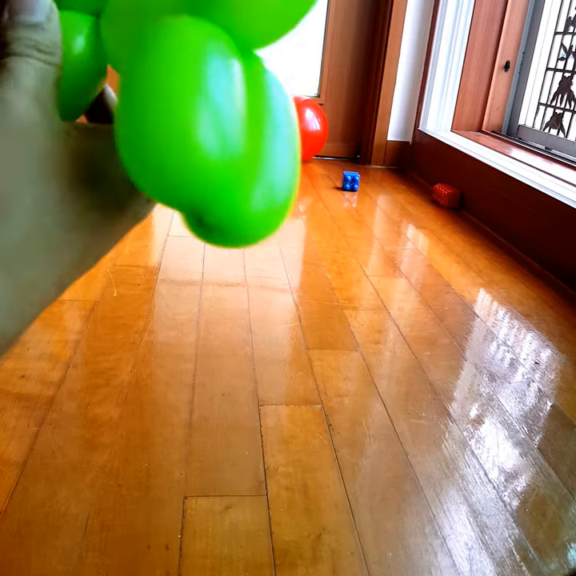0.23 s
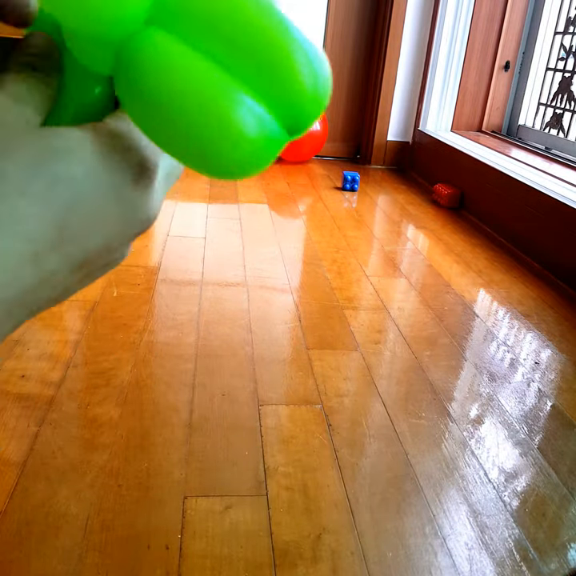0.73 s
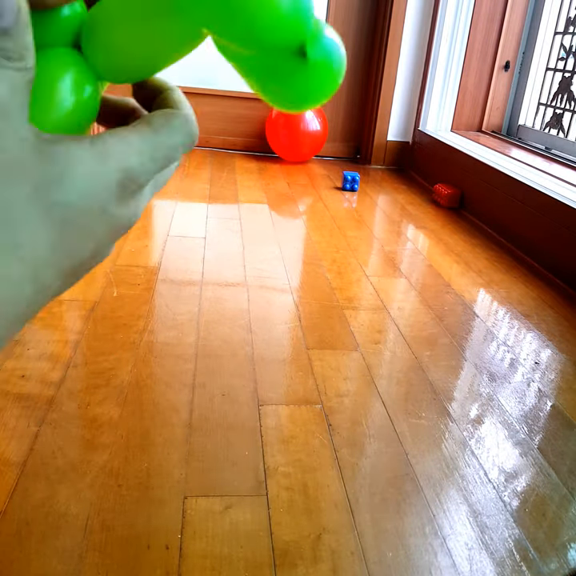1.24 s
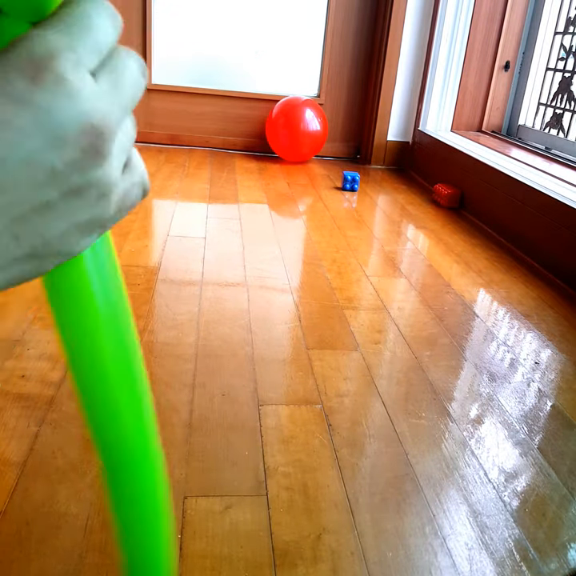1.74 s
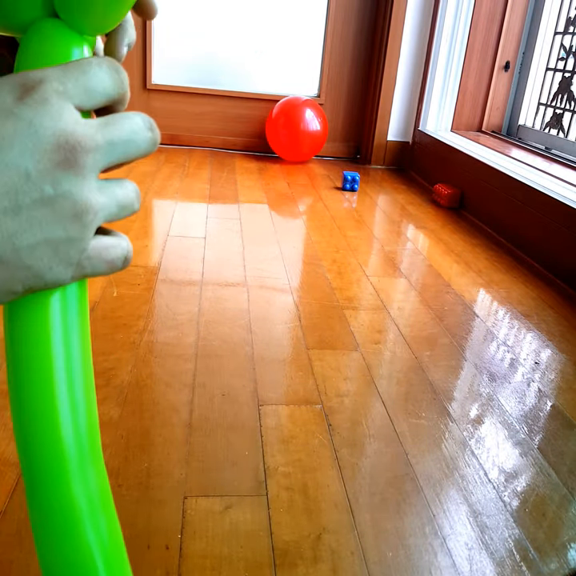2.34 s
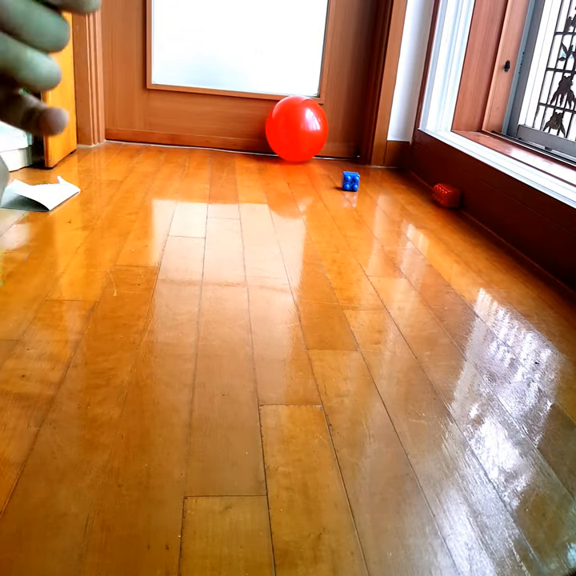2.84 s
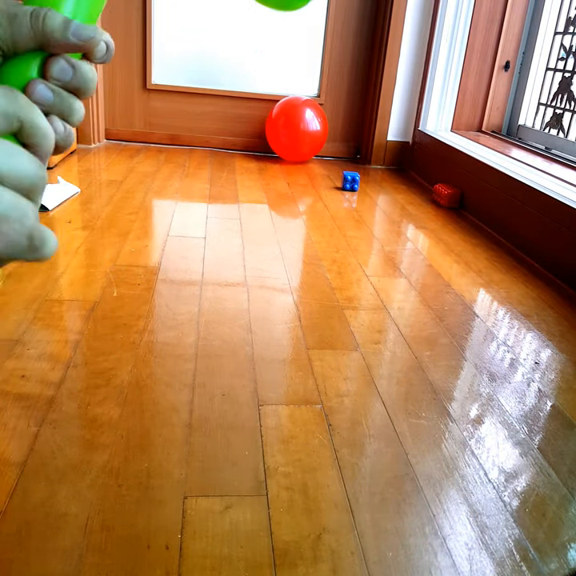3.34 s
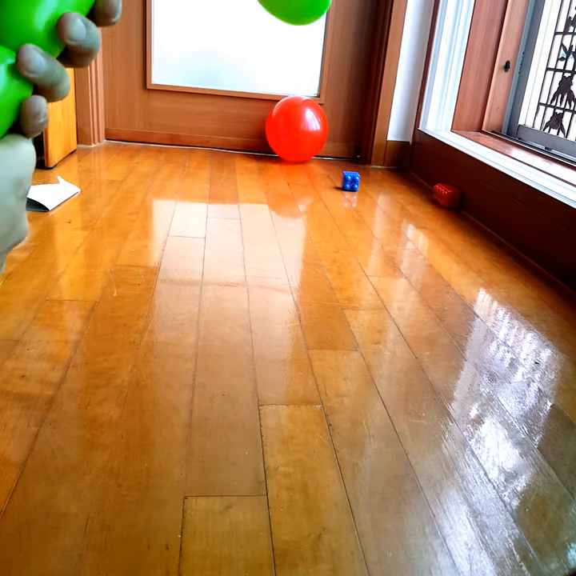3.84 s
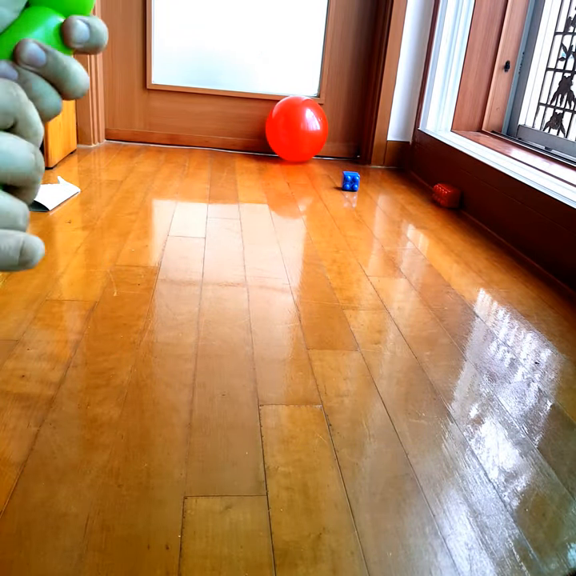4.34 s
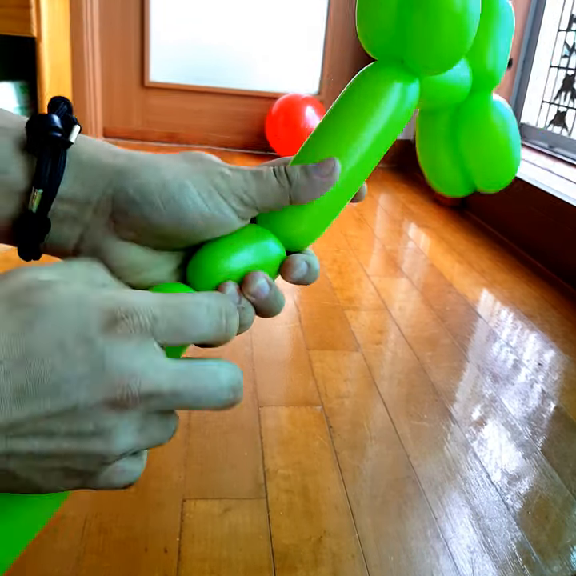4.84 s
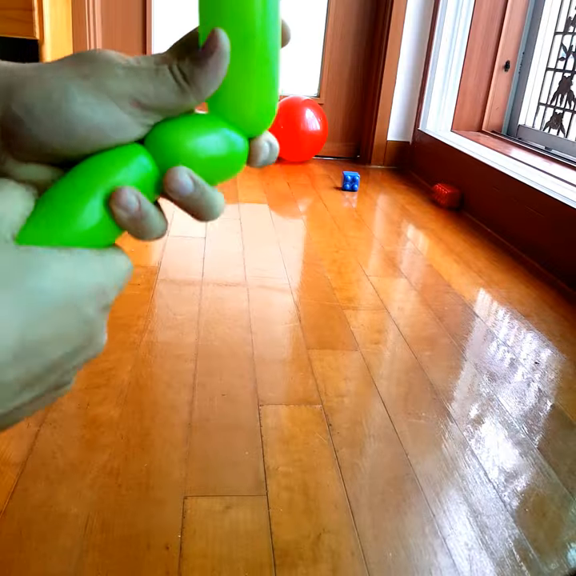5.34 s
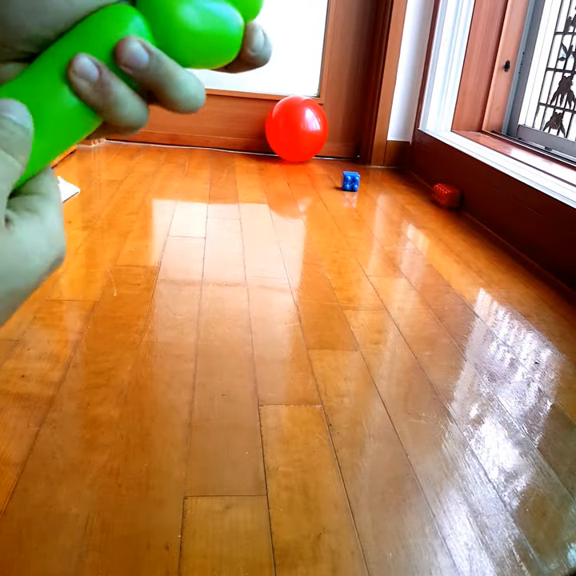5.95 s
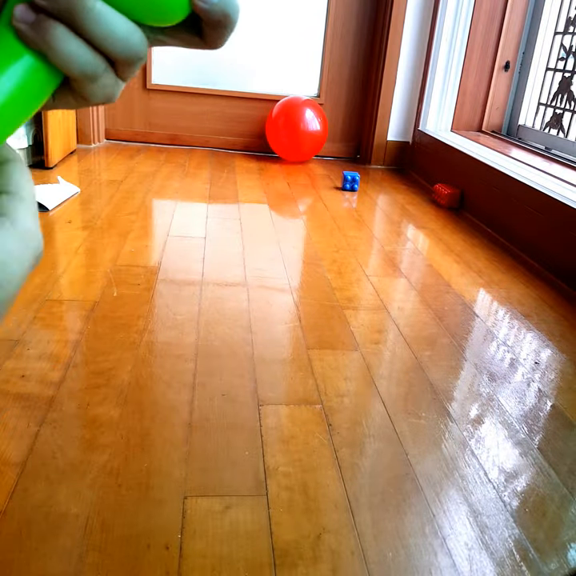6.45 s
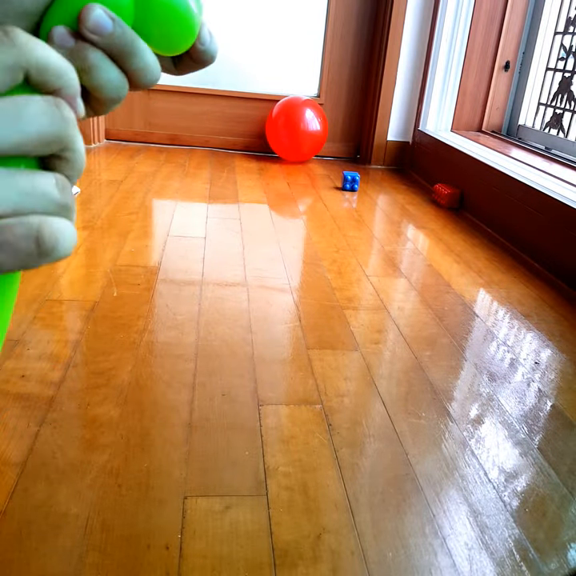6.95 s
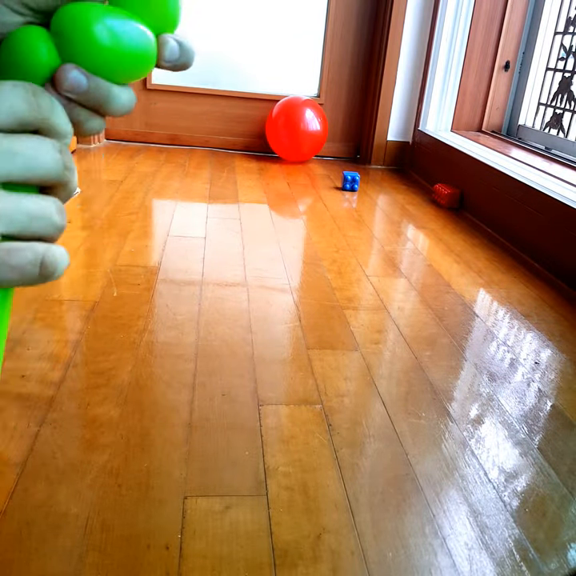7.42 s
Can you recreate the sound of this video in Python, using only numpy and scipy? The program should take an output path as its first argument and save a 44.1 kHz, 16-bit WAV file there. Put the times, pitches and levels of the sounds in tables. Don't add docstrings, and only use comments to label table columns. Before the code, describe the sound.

Hands twist a long latex balloon up close, giving rubbery squeaks, stuttering creaks and sharp little snaps in a small quiet room.

```python
import sys
import numpy as np
from scipy import signal
from scipy.io import wavfile
from scipy.ndimage import uniform_filter1d, minimum_filter1d

SR = 44100
rng = np.random.default_rng(int(sys.argv[2]) if len(sys.argv) > 2 else 0)


def wrap_up_sound(samples):
    columns = np.atleast_2d(samples).T
    tamed = np.clip(columns, -1, 1)
    steps = np.round(tamed * 32767).astype(np.int16)
    wavfile.write(sys.argv[1], SR, steps)


def ratio(d):
    e = np.asarray(d, float) / 20
    return 10 ** e


N = 338688

# [t/s, level/dB, brightness of all rubbing/dB]
DRAG = [(0.0, -50, -6.5), (0.21, -29, -4.5), (0.83, -47, -7.5), (0.98, -40, -3), (1.73, -49.5, -5.5),
        (1.92, -26, -6), (2.37, -48, -14.5), (2.69, -47, -14), (2.95, -26, -6), (4.11, -31.5, -3.5),
        (4.49, -47, -9), (5.09, -27, -9), (5.69, -31, -11), (6.59, -27, -7), (7.04, -80, -9),
        (7.68, -57, -16.5)]
# [t/s, ring f/Hz, brightness/dB, fullness/dB]
GRIPS = [(0.0, 2080, -9, -16), (0.055, 3060, 2, 4), (0.179, 3800, -0.5, 5), (0.276, 3800, 6.5, 1.5),
         (0.477, 3780, 8, 1), (0.563, 3800, 5.5, 4.5), (0.807, 3440, -8, 6), (0.958, 4700, -6, 2),
         (1.084, 3600, 4.5, -3.5), (1.41, 3880, 6, -7), (1.721, 3640, 2.5, 1), (1.866, 1510, 4, -21),
         (1.975, 3350, 5, 4), (2.15, 3360, 14.5, 10), (2.707, 3540, 3, -1), (2.794, 3730, 7.5, 4.5),
         (2.863, 4030, 4.5, 4), (2.945, 2930, -10, -15), (3.045, 3730, 5, -14), (3.108, 2600, 3, 4.5),
         (3.3, 4560, 3, -21), (3.409, 1790, 6, -15), (3.475, 3820, -0.5, 7), (3.542, 3650, 0, -2),
         (3.802, 3320, 6.5, -2), (3.86, 4830, -7, 4.5), (4.142, 3750, 1, -1), (4.28, 3850, 6.5, -5),
         (4.463, 3470, 3, -8), (4.711, 2620, 0.5, -4), (4.778, 4950, 1, -1), (4.861, 3570, 2.5, 10),
         (4.918, 2060, 0.5, -5), (5.124, 3670, 2.5, -13), (5.278, 3500, 6.5, -5), (5.39, 2640, 1.5, 5.5),
         (5.545, 2460, -11, -9), (5.65, 2170, 5, -12), (5.72, 3630, -1, 9.5), (5.891, 3800, 7.5, 6.5),
         (6.018, 3600, -2, 0.5), (6.202, 3300, -1, -1), (6.336, 2500, 2.5, 2), (6.438, 3870, 10, 4.5),
         (6.59, 3350, 3.5, -12), (6.662, 3940, -0.5, 3), (6.91, 3500, 0, 0), (7.144, 3200, 7.5, 8),
         (7.344, 3300, 8.5, 6), (7.512, 3480, 10, 5.5)]
# [t/s, ring f/Hz]
VISITS = [(.05, 2660), (.439, 1490), (1.051, 6300), (1.435, 7250), (1.877, 1400), (1.916, 1440),
          (2.63, 1490), (2.945, 3050), (3.12, 2610), (3.668, 6540), (3.7, 6240), (3.812, 7200),
          (3.989, 6740), (4.052, 9100), (4.098, 9600), (4.561, 1680), (4.728, 2900), (4.788, 4800),
          (4.91, 2330), (4.941, 2330), (5.474, 2670), (5.541, 2630), (5.695, 2150), (5.944, 4400),
          (6.042, 6540), (6.361, 2580), (7.55, 7000)]
# [t/s, length/ms, peak level/dB, air-chamber level/dB]
LET_GOES = [(0.0, 18, -26, -30), (.186, 41, -29, -12), (.575, 136, -35, -2.5), (1.434, 5.7, -24.5, -6),
            (1.729, 15, -27.5, -20), (1.771, 92, -21.5, -13.5), (1.876, 50, -30, -9),
            (1.917, 38, -26.5, -3.5), (2.026, 104, -22, -5), (2.32, 8.7, -27.5, 4.5),
            (2.743, 49, -28, -0.5), (3.252, 14.6, -24, -16), (3.487, 32, -27, -3.5), (4.033, 2.3, -26, -8),
            (4.29, 39, -25.5, -25), (4.33, 58, -28, -26), (4.941, 53, -23.5, -12), (5.088, 58, -21, -15),
            (5.173, 32, -9.5, -20), (5.474, 51, -33.5, -14), (5.58, 55, -21.5, -27), (5.694, 24, -19, -5),
            (5.944, 64, -24.5, -8), (6.678, 30, -21, -14), (6.823, 137, -32, -11), (6.986, 54, -23.5, -12),
            (7.476, 10, -21.5, -30), (7.498, 7.8, -22, -22)]
EASES = [(.073, 17, -35, -21), (.22, 32, -29, -7), (.356, 8.2, -18.5, -6.5), (.858, 13, -29, -21),
         (1.064, 54, -34, 0), (2.819, 38, -31, -12), (3.053, 76, -30.5, -19), (3.331, 39, -25, -34),
         (3.81, 51, -33.5, -11.5), (3.867, 54, -36.5, -16), (3.988, 88, -32.5, -9), (4.131, 51, -28, -29),
         (4.722, 54, -28, -33), (4.788, 39, -31, -9), (5.138, 26, -15, -39), (5.729, 61, -29.5, -7),
         (6.046, 28.4, -15.5, -9.5), (6.942, 57, -27.5, -9)]
SLIDES = [(.088, 23.6, -31.5, 3), (.439, 41, -50, 19.5), (.967, 60, -39.5, -6.5), (1.1, 42.6, -28.5, -26),
          (2.356, 17, -44.5, 3), (2.621, 120, -49.5, 4.5), (2.952, 30.5, -25.5, -31),
          (3.124, 43, -25.5, -27), (3.371, 70, -34.5, -34), (3.715, 21, -26, -24), (4.15, 32, -24.5, -20),
          (4.491, 32, -32.5, -33), (4.548, 54, -34, -6.5), (4.871, 26, -31.5, -11), (4.988, 26, -32.5, 1),
          (5.045, 32.5, -27, -17), (5.308, 32, -22.5, -9), (5.655, 23, -36.5, -27), (5.887, 64, -32, -6),
          (6.264, 15, -30.5, -27), (6.342, 79, -31, -12), (6.613, 16, -24, -10)]
PRESSES = [(.022, 19, -27, -37), (.05, 27.4, -22, -43), (.395, 25, -31.5, -28), (1.085, 14, -26, -27),
           (2.802, 19, -24, -28), (3.552, 62, -26.5, -5.5), (3.668, 54, -19.5, -41), (4.15, 43.4, -14, -14),
           (4.909, 26.4, -23, -15), (5.012, 37, -34, -4), (5.286, 22, -19, -39), (5.744, 46, -30, -4),
           (6.169, 16.1, -24.5, -30), (6.195, 66, -23.5, -14), (6.451, 51, -20, -3.5),
           (7.041, 19.8, -27.5, -5), (7.165, 34.7, -22, -17), (7.513, 39.6, -19.5, -15),
           (7.549, 20, -19, -1.5)]
BUILDS = [(.25, 77, -33.5, -21), (.346, 8.8, -19, -3), (.494, 8, -23, -16), (.876, 59, -33, -11),
          (1.745, 22, -24.5, -29), (1.989, 29, -26, -22), (2.088, 10.4, -27.5, -18),
          (2.858, 77, -21.5, -40), (3.303, 33, -28, -34), (4.057, 45, -20.5, -12), (5.552, 19, -23.5, -35),
          (6.316, 23, -30.5, -20), (6.73, 10.3, -18, -19), (6.905, 36, -27, -16), (7.336, 83, -19, -3.5)]
# [f/Hz, level per Hz/dB]
SKIN = [(470, -36), (800, -7.5), (908, -33.5), (1080, -12), (2870, -5.5), (3850, 1.5), (4480, -8.5),
        (6300, -12), (7150, -9), (8020, -16.5), (9330, -11), (14700, -20.5), (15900, -30), (16500, -76)]
# [f/Hz, width/Hz, level/dB]
CHAMBER = [
    (500, 134, -3),
    (635.6, 90, 6.5),
    (868, 51, 2.5),
    (1050, 104, 2.5),
]


def rubbing():
    t = np.arange(N) / SR
    drag_t, drag_db, bright_db = np.transpose(DRAG)
    drag_db, bright_db = np.interp(t, drag_t, drag_db), np.interp(t, drag_t, bright_db)
    power, low_power = ratio(2 * (drag_db - 18)), ratio(2 * (drag_db - 58))

    grips = np.array(GRIPS, float)
    grip = grips[np.searchsorted(grips[1:, 0], t)]
    patch_hz, sheen_db, full_db = uniform_filter1d(grip[:, 1:], size=300, axis=0).T
    visit_ms = 45
    for s, hz in VISITS:
        patch_hz[round(s * SR):][:round(visit_ms * SR / 1000)] = hz

    kinds = (LET_GOES, -24), (EASES, -8.5), (SLIDES, 0), (PRESSES, 12), (BUILDS, 19.5)
    for rows, change_db in kinds:
        for s, ms, peak_db, low_db in rows:
            ramp_db = np.linspace(0, change_db, round(ms * SR / 1000 + 2))
            burst = ratio(2 * (peak_db + ramp_db - ramp_db.max() - 2))
            add(power, s, burst)
            add(low_power, s, burst * ratio(2 * (low_db - 2.5)))
    power, low_power = uniform_filter1d(power, size=40), uniform_filter1d(low_power, size=200)

    drive = crackle(per_s=1700, spread_db=6.5, hiss=.2)
    beside = crackle(per_s=1700, spread_db=6, hiss=.22)
    fleeting = chirps(low_hz=1100, high_hz=7500, cycles=9, glide=.2, spread_db=9)

    skin = evened(coloured(drive + ratio(-8.5) * fleeting, SKIN))
    high = filtered(skin, 2, 5500, "high")
    low = filtered(skin, 2, 2300, "low")
    gleam = filtered(high, 1, 10000, "low")

    patch = evened(resonate(beside, patch_hz * (1 + .09 * wobble(N, size=1400)), 380))
    lobe = evened(resonate(resonate(drive + beside, patch_hz, 2040), patch_hz, 1980))
    chamber = evened(sum(ratio(db) * resonate(resonate(beside, hz, w), hz, 1.2 * w) for hz, w, db in CHAMBER))

    bright = (ratio(bright_db + 11) - 1) * high
    sheen = ratio(bright_db + 8.5) * (ratio(sheen_db) - 1) * gleam
    body = (ratio(full_db) - 1) * low
    upper = ratio(3.5) * (skin + bright + sheen + body) + ratio(-5) * patch + ratio(-3) * lobe
    return np.sqrt(abs(power)) * upper + np.sqrt(abs(low_power)) * chamber


def crackle(per_s, spread_db, hiss):
    size = ratio(spread_db * np.minimum(rng.exponential(1, N), 2.6)) * (rng.random(N) < per_s / SR)
    clumps = ratio(2.6 * wobble(N, size=90))
    slips = clumps * (evened(size * rng.choice([-1, 1], N)) + hiss * rng.standard_normal(N))
    strain = abs(uniform_filter1d(slips ** 2, size=500))
    return evened(slips / strain ** .4)


def chirps(low_hz, high_hz, cycles, glide, spread_db):
    out = np.zeros(N)
    for at, pitch, length, bend, size in rng.random((1600, 5)):
        hz = low_hz * (high_hz / low_hz) ** pitch
        n = int(SR / hz * cycles * (0.8 + 1.59 * length)) + 8
        turns = np.cumsum(np.linspace(hz, hz * (1 + glide * (2 * bend - 1)), n)) / SR
        tone = np.sin(2 * np.pi * turns) + 1.66 * np.sin(4 * np.pi * turns)
        add(out, at * N / SR, ratio(spread_db * size) * tone * np.hanning(n) ** 2.7)
    return evened(out)


# [t/s, length/ms, middle f/Hz, level/dB]
GROANS = [(.218, 21, 687, -29.5), (1.275, 11.3, 640, -31), (1.894, 44, 722, -26.5), (1.895, 42, 1420, -28),
          (4.566, 90, 1640, -36), (4.567, 60, 625, -43), (4.636, 44, 610, -40), (5.045, 6.9, 1320, -20),
          (5.165, 22, 810, -19), (5.184, 24, 705, -14), (5.204, 24, 700, -19), (5.238, 46, 670, -26),
          (6.531, 10, 775, -29.5), (6.733, 22, 685, -29)]
SQUEALS = [(1.936, 40, 700, -36), (3.105, 16, 1770, -29), (3.425, 19, 1628, -23.5), (4.15, 34, 3800, -17),
           (4.182, 12, 7070, -16), (4.682, 19, 1050, -38), (4.736, 16, 2600, -25), (5.149, 7, 1500, -13),
           (5.155, 16, 3936, -5), (5.695, 3.4, 2093, -9), (5.924, 34, 610, -21), (5.955, 34, 620, -29),
           (6.471, 46, 611, -28.5), (6.629, 10.6, 3250, -15), (6.689, 10, 730, -27), (7.368, 28, 1090, -24)]
SWOOPS = [(.029, 10, 2000, -31), (.036, 16, 1500, -29), (.061, 20, 950, -30), (.066, 14, 3150, -27),
          (3.412, 20, 1430, -36), (3.489, 16, 1100, -34), (4.17, 39, 681, -28), (5.318, 12, 1042, -21)]
BUZZES = [
    (3.696, 16, 1585, -21.5),
    (4.102, 12, 4780, -21),
    (7.4, 24, 521, -33),
    (7.565, 20, 725, -31),
]
RISES = [(.06, 20, 2453, -32), (1.877, 12, 1330, -24.5), (1.605, 14, 2170, -43), (3.313, 19, 3190, -22.5),
         (3.34, 16, 567, -41), (3.424, 30, 3120, -28), (3.55, 31, 1160, -28), (3.562, 22, 2430, -31.5),
         (4.082, 15, 2100, -28), (6.385, 13, 1730, -28.5), (6.396, 13, 2686, -26.5)]
WHINES = [(3.325, 9.5, 4600, -18), (3.812, 25, 7730, -33), (3.866, 21, 3850, -22.5),
          (3.866, 27.5, 7620, -26), (3.9, 31, 3130, -31.5), (4.17, 19, 2293, -14.5), (4.165, 35, 7050, -19),
          (4.79, 26, 4940, -26), (5.168, 21, 3820, -23), (6.452, 15.5, 3935, -15), (6.94, 23, 3766, -19.5)]


def squeaks():
    out = np.zeros(N)
    kinds = ((GROANS, -.1, -17.5), (SQUEALS, .024, -16), (SWOOPS, .25, -7),
             (BUZZES, .03, -3), (RISES, .11, -16.5), (WHINES, -.057, -16))
    for rows, bend, over_db in kinds:
        for s, ms, hz, db in rows:
            start_hz, end_hz = hz * (1 - bend / 2), hz * (1 + bend / 2)
            n = round(ms * SR / 1000)
            unsteady = 1 + .025 * wobble(4800, size=60)[:n]
            turns = np.cumsum(np.linspace(start_hz, end_hz, n) * unsteady) / SR
            tone = np.sin(2 * np.pi * turns)
            for k in range(2, min(7, int(15500 // end_hz) + 1)):
                rough_db = 3 * wobble(4800, size=50)[:n]
                tone += ratio(over_db - 3.5 * (k - 3.5) + rough_db) * np.sin(2 * np.pi * k * turns + k)
            flutter = evened(ratio(2.2 * wobble(4800, size=100)[:n]))
            add(out, s, ratio(db - .5) * tone * flutter * signal.windows.tukey(n, .35))
    return out


# [t/s, peak level/dB, ring f/Hz]
SNAPS = [(0.629, -22, 3520), (0.662, -17, 3640), (0.968, -17.5, 3060), (1.044, -17.5, 4870),
         (1.065, -5.5, 6100), (1.114, -7, 3420), (1.356, -15, 1360), (1.481, -27.5, 4600),
         (1.843, -13.5, 3660), (2.028, -7.5, 3240), (2.159, -18, 1440), (2.453, -25.5, 5540),
         (2.683, -22.5, 1790), (3.138, 2, 2600), (1.091, -14, 5150), (4.692, -16.5, 3850),
         (4.899, -4.5, 3700), (5.262, -13, 3120), (5.331, -3.5, 3760), (5.339, -6.5, 3800),
         (5.416, -14.5, 3730), (5.427, -15, 2680), (5.695, -9.5, 2200), (5.729, -6, 3780),
         (5.783, -24, 3430), (6.872, -22, 3280), (7.166, -19, 2010), (7.274, -17.5, 2000),
         (7.367, -11, 4600),
         (.741, -30, 1190), (2.272, -29, 4200), (2.359, -27, 3450), (.988, -19, 4900), (1.003, -19, 4400),
         (1.237, -30.5, 1500), (1.302, -32, 900), (1.588, -32.5, 1500), (2.191, -25, 700),
         (2.39, -35, 3320), (2.402, -28, 3300), (2.41, -32, 3300), (2.43, -41, 3500), (2.567, -39, 1200),
         (5.321, -11.5, 850), (5.825, -25, 11100), (5.947, -13, 7000), (5.613, -23, 5000),
         (5.785, -18, 1300), (5.792, -22, 1400),
         (0.0313, -16, 3580), (0.0699, -8, 2760), (0.0916, -14, 8020), (0.3542, -0.5, 3630),
        (0.4978, -9.5, 3800), (1.0967, -8, 3580), (1.7717, -8.5, 3240), (1.7782, -7, 4000),
        (2.812, -10, 6900), (2.9149, -6, 7100), (2.9566, -10, 2680), (3.055, -16, 4000), (3.1251, -7, 2520),
        (4.0328, -14.5, 7000), (4.3328, -11, 4050), (4.5126, -21, 3840), (5.1076, -13, 1410),
        (5.3024, -9, 2320), (5.5835, -19, 3120), (6.049, -2, 7250), (6.4965, -9.5, 3230),
        (6.6311, -5, 3190), (6.6894, -8.5, 3900), (6.7385, -22, 3820), (6.9376, -13, 3800),
        (7.3953, -10.5, 3210), (7.4056, -5.5, 5500), (7.4774, -19, 2340), (7.4989, -19.5, 4040),
        (7.543, -15, 3710)]


def snaps():
    out, t = np.zeros(N), np.arange(400) / SR
    for (s, db, hz), burst in zip(SNAPS, rng.standard_normal((99, 400))):
        click = evened(coloured(burst * np.exp(-t / 0.0001), SKIN)) / 6.3
        ring = .83 * np.sin(2 * np.pi * hz * t) * np.exp(-t / 0.001)
        add(out, s, ratio(db) * (click + ring))
    return out


# [t/s, level/dB, f/Hz, length/ms]
THUMPS = [(2.617, -55, 278, 53), (2.66, -66, 98, 140), (2.889, -41, 471, 19), (2.8, -61, 188, 230),
          (2.945, -56, 236, 135), (3.04, -52, 100, 75), (3.05, -50.5, 165, 61), (7.1, -68, 72, 335),
          (7.588, -54, 245, 50)]


def thumps():
    out = np.zeros(N)
    for s, db, hz, ms in THUMPS:
        n = round(ms * SR / 1000)
        noise = rng.standard_normal(16000)
        rumble = evened(resonate(resonate(noise, hz, 45), hz, 45)[1000:][:n])
        tone = np.sin(2 * np.pi * hz * np.arange(n) / SR)
        add(out, s, ratio(db) * (tone + .5 * rumble) * signal.windows.tukey(n, .6))
    return out


# [f/Hz, time to fall 60 dB/s]
SCATTER = [
    (300, 0.024),
    (14000, 0.023),
]
# [f/Hz, time to fall 60 dB/s]
ROOM = [(300, 0.11), (800, 0.21), (2000, 0.23), (5500, 0.24), (14000, 0.13)]
# [f/Hz, likeness from 0 to 1]
SAME = [(30, 0.31), (70, 1), (300, 0.85), (700, 0.98), (1500, 0.39), (4000, 0.11)]


def echoes(x, decays, count, first, sets):
    taps = np.zeros((2, sets, first + 8 * count))
    places = first + 8 * np.arange(count) + rng.integers(0, 8, (2, sets, count))
    np.put_along_axis(taps, places, rng.choice([-1., 1.], (2, sets, count)), 2)
    hz, t, z = signal.stft(taps, SR, nperseg=64)
    same = np.clip(read(SAME, hz), -1, 1)[:, None]
    z[1] = same * z[0] + np.sqrt(1 - same ** 2) * z[1]
    tails = signal.istft(z * ratio(-60 * t / read(decays, hz)[:, None]), SR, nperseg=64)[1]
    tails /= np.linalg.norm(tails[0], axis=1)[:, None]

    hop = 1536
    padded, out = np.pad(x, (hop, 2 * hop)), np.zeros((N + 16 * hop, 2))
    fade = np.sin(np.pi * np.arange(2 * hop) / (2 * hop))
    for k in range(N // hop + 1):
        piece = padded[k * hop:][:2 * hop] * fade
        add(out, k * hop / SR, signal.fftconvolve(piece[None], tails[:, k % sets], axes=1).T)
    return out[hop:hop + N].T


# [f/Hz, level per Hz/dB]
TONE = [(24, -28), (90, -19), (190, -13), (310, -12.5), (550, -3), (656, -9), (763, -1), (1940, -14.5),
        (2200, -15.5), (2490, -19), (3300, -13), (4300, -27), (12200, -15.5), (15300, -43), (16500, -58)]


def room_tone():
    frames, hz = N // 256 + 5, np.fft.rfftfreq(1024, 1 / SR)
    a, b, c, d, patches = rng.standard_normal((frames, 513, 5)).T
    patches = evened(uniform_filter1d(uniform_filter1d(patches, size=8, axis=0), size=10, axis=1))
    same, left = np.clip(read(SAME, hz), -1, 1)[:, None], a + 1j * b
    right = same * left + np.sqrt(1 - same ** 2) * (c + 1j * d)
    z = np.array([left, right]) * ratio(read(TONE, hz)[:, None] + 1.6 * patches)
    return ratio(-50) * evened(signal.istft(z, nperseg=1024, noverlap=768)[1][:, :N])


# [f/Hz, width/Hz, level/dB]
HUMS = [
    (178.3, 27, -70.5),
    (237.3, 15, -71),
]


def hum():
    return sum(ratio(db) * evened(resonate(resonate(rng.standard_normal(N), hz, w), hz, w)) for hz, w, db in HUMS)


def evened(x):
    return x / np.sqrt(np.mean(x ** 2) + 1e-20)


def read(points, hz):
    f, value = np.transpose(points)
    return np.interp(np.log(hz + 1), np.log(f + 1), value)


def add(mix, s, sound):
    part = mix[max(round(s * SR), 0):][:len(sound)]
    part += sound[:len(part)]


def filtered(x, order, hz, side):
    return signal.sosfilt(signal.butter(order, hz, side, fs=SR, output="sos"), x)


def resonate(x, hz, width):
    turn = np.exp(2j * np.pi * np.cumsum(hz * np.ones(len(x))) / SR)
    r = np.exp(-np.pi * width / SR)
    return 2 * (turn * signal.lfilter([1 - r], [1, -r], x / turn + 1e-18)).real


def coloured(x, points):
    db = np.maximum(read(points, abs(np.fft.fftfreq(4096, 1 / SR))), -100)
    taps = np.fft.ifft(np.exp(np.conj(signal.hilbert(np.log(ratio(db)))))).real[:2048]
    return signal.oaconvolve(x, taps)[:len(x)]


def wobble(n, size):
    return evened(uniform_filter1d(uniform_filter1d(rng.standard_normal(n), size), size))


def scene():
    sung = squeaks()
    balloon = filtered(rubbing() + snaps() + sung, 4, 330, "high")
    balloon = balloon + ratio(-36) * np.roll(balloon, shift=245)
    shine = filtered(balloon, 2, 6000, "high")
    left = ratio(-4.6) * (balloon + .3 * shine)
    right = ratio(-3) * np.roll(balloon, shift=6)
    treble = filtered(balloon, 2, 1300, "high")
    near = ratio([[-2.2], [-2.1]]) * echoes(treble, SCATTER, count=60, first=12, sets=60)
    far = ratio(-11) * echoes(balloon - .5 * sung, ROOM, count=1250, first=300, sets=9)
    return np.array([left, right]) + near + far + thumps() + room_tone() + hum()


def top_cut(x):
    return signal.sosfilt(signal.butter(12, 15900, fs=SR, output="sos"), x)


def record(dry):
    room_left = np.minimum(.97 / (abs(dry).max(0) + 1e-9), 1)
    gain = uniform_filter1d(minimum_filter1d(room_left, size=301), size=151)
    return top_cut(dry * gain)


dry = scene()
out = record(dry)
wrap_up_sound(out)
```